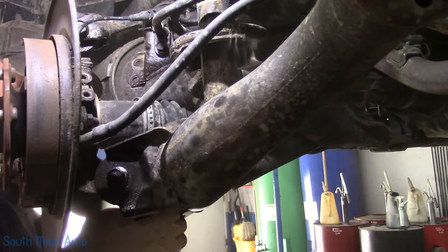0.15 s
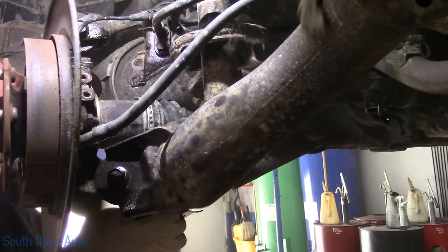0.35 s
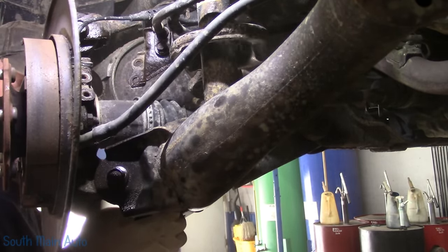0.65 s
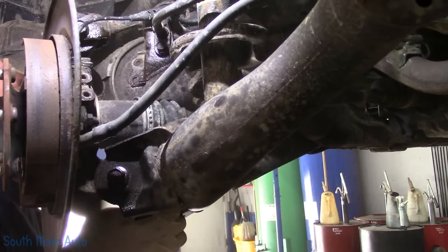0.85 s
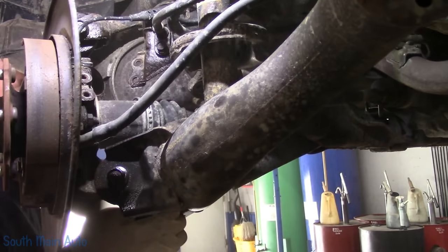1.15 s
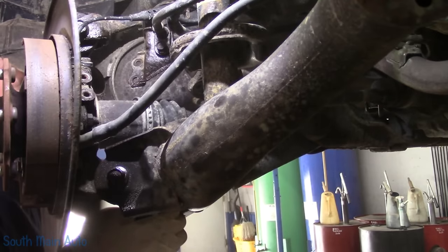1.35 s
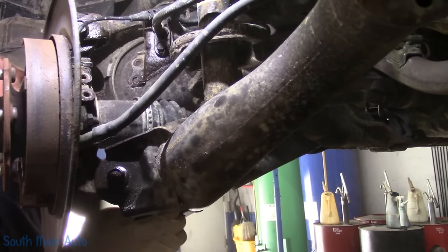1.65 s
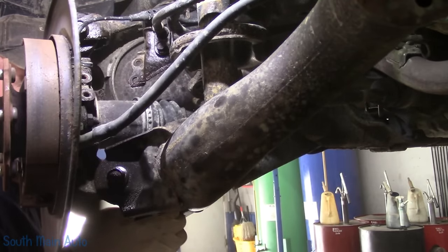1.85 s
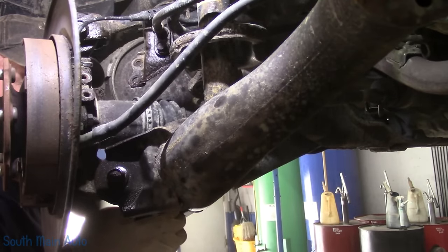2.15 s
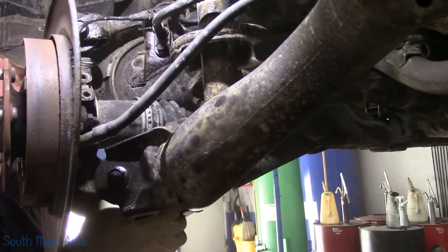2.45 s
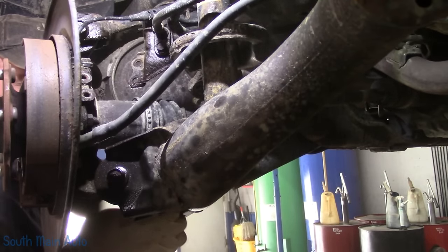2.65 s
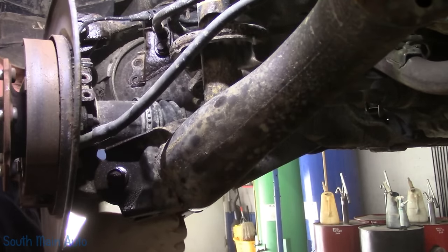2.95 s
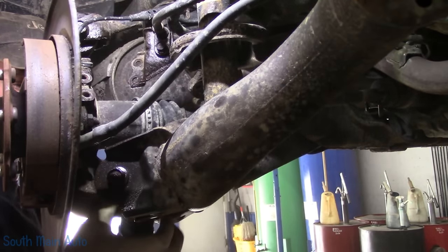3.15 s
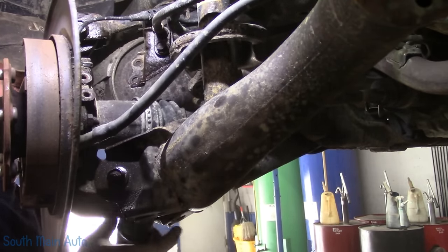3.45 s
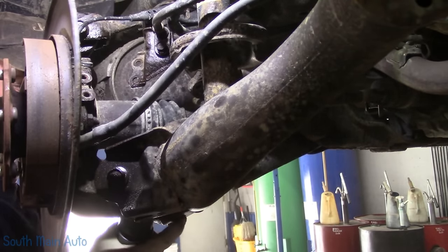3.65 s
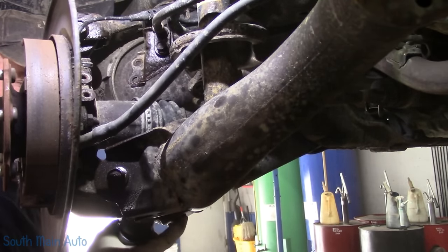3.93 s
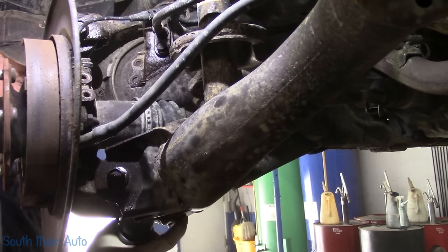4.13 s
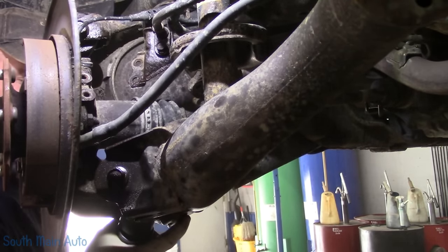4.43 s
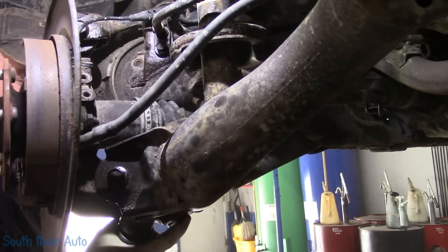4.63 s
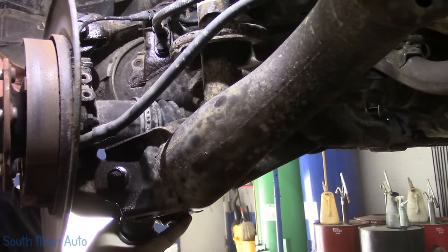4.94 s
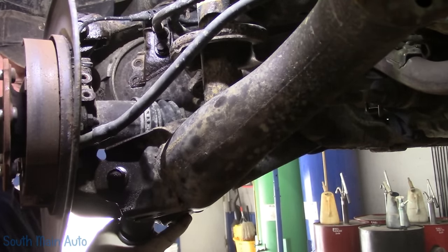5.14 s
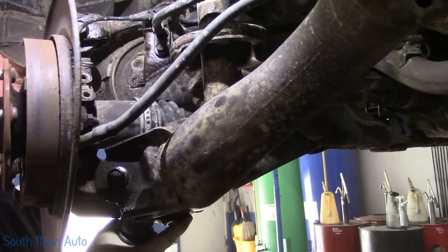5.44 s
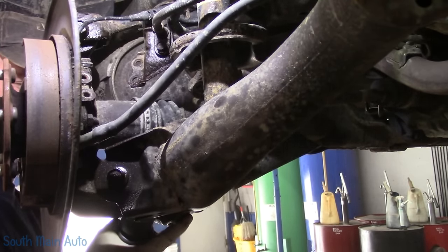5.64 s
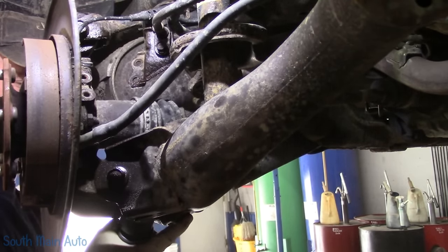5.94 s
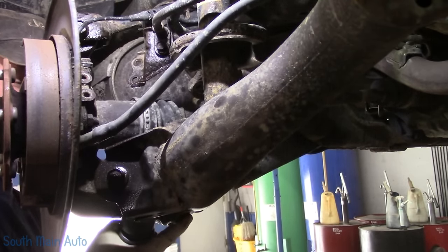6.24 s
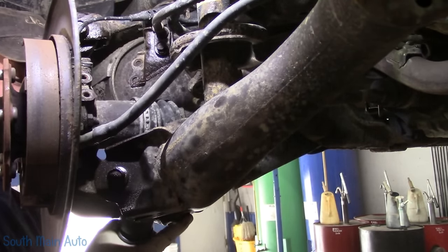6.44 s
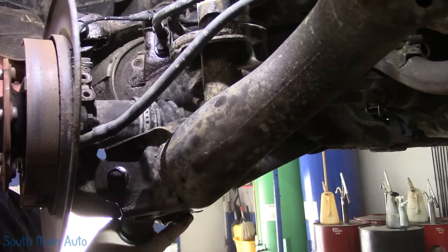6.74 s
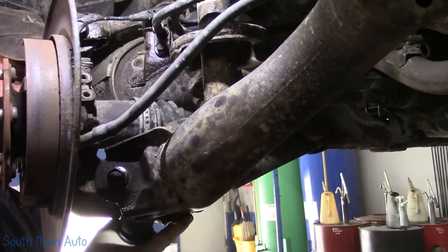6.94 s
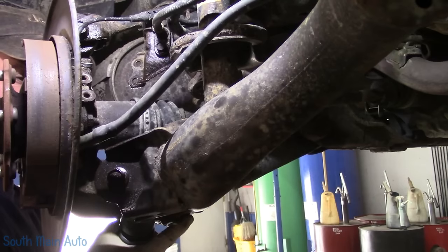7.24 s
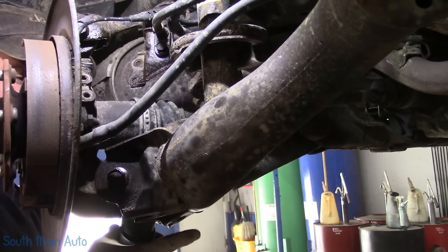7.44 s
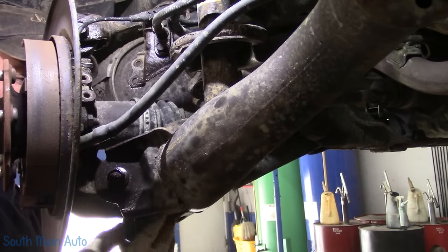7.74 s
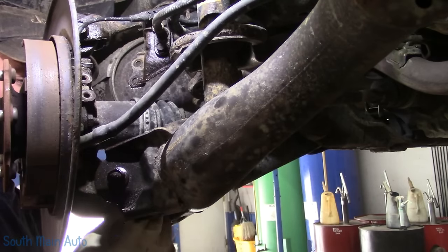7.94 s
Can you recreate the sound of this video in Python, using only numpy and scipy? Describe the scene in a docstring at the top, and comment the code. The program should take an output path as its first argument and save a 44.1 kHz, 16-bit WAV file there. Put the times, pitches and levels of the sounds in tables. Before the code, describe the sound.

Very close, loud air hammer already running on a socket over a rusted bolt beneath a car: rapid, hard steel cracks with ringing metal, rattling panels and a clanging suspension arm. It stops suddenly after about seven seconds; a burst of air and the garage echo swell up and fade, followed by a few light clinks and a dull bump.

```python
"""An air hammer pounds a socket on a rusted suspension bolt under a car, about 29 blows a second.
Each blow is a burst of noise for the crack, fading tones for the steel and a low clang in the chassis.
Panels rattle, spent air puffs out, and fading noise makes the garage's echo. Gain control holds it all down,
so a last rush of air and the echo swell when the piston stalls.
Then come light clinks and a dull bump as the tool is lifted off."""
import sys
import numpy as np
from scipy import signal
from scipy.fft import rfft, irfft
from scipy.io import wavfile
from scipy.ndimage import uniform_filter1d, minimum_filter1d

SR = 44100
rng = np.random.default_rng(int(sys.argv[2]) if len(sys.argv) > 2 else 0)


def to_wav(s):
    """Save 16-bit WAV."""
    ch = np.atleast_2d(s).T  # columns
    pcm = np.round(np.clip(ch, -1, 1) * 32767)  # PCM
    wavfile.write(sys.argv[1], SR, pcm.astype(np.int16))


N = 356560

# Background hiss of the workshop. Each row: frequency in Hz, relative level in dB per Hz.
SHOP_SPECTRUM = [(30, -6.5), (100, -17.5), (400, -3.5), (1300, 2.5), (3700, -6), (8000, -17.5),
                 (15000, -30.5)]
SHOP_LEVEL_DB = -66
# How long the garage echoes. Each row: frequency in Hz, time to fade by 60 dB in seconds.
GARAGE_FADE = [(50, .5), (200, 1.2), (500, 0.7), (1200, 0.87), (2500, 0.9164), (4000, 0.7678),
               (7000, 0.6078), (10000, .5), (15000, 0.01)]
# How strongly the garage echoes. Each row: frequency in Hz, echo level in dB.
GARAGE_LEVEL = [(150, 2), (500, -1.5), (1200, 2), (2500, -3), (4000, -4), (7000, -6), (10000, -9.5),
                (15000, 2)]
# Difference between the two microphone ports. Each row: frequency in Hz, side minus mid in dB.
PORT_DIFFERENCE = [(50, -20.5), (150, -33), (350, -44.5), (1500, -88.5), (3000, -60), (4500, -21.5),
                   (7000, -13.5), (15000, -13.5)]
# Dull low thumps under the hammering. Each row: time in seconds, level in dB.
LOW_THUMPS = [(3.254, -18), (3.365, -24), (3.7, -23), (3.865, -22), (4.01, -27), (4.418, -19), (4.81, -19),
              (5.29, -20), (5.326, -20), (5.915, -24), (6.557, -26)]
# Colour of the body panels' chatter. Each row: frequency in Hz, relative level in dB per Hz.
PANEL_SPECTRUM = [(30, 1.5), (85, -13), (170, -11.5), (230, -17), (370, -4), (500, 1.5), (900, -4),
                  (1400, -4.5), (2200, -2.5), (4000, -10), (9000, -21.5)]
# Colour of the spent air. Each row: frequency in Hz, relative level in dB per Hz.
EXHAUST_SPECTRUM = [(30, -2.5), (300, -1), (1500, 1), (3000, -4.5), (4500, 2.5), (7000, -8.5), (10000, -14),
                    (16000, -23)]
# Air rushing out once the piston stalls, until the valve shuts. Each row: time in seconds, level in dB.
VENT_LEVEL = [(7.16, -52), (7.24, -27.5), (7.31, -30), (7.38, -32), (7.44, -36.5), (7.52, -57)]
# Colour of that rush of air. Each row: frequency in Hz, relative level in dB per Hz.
VENT_SPECTRUM = [(30, -47.5), (300, -17), (900, -2.5), (2400, -1.5), (3600, 0), (7000, -12), (10000, -31),
                 (16000, -53)]
# The loose bit and socket knock as the tool is lifted.
# Each row: time in seconds, level in dB, ring in Hz, its 60 dB fade in seconds, relative tick level in dB.
LIFT_CLINKS = [(7.448, -66.5, 12500, .01, 2.5), (7.584, -67, 11400, 0.0093, 0),
               (7.606, -61, 10040, 0.043, 11), (7.885, -54.5, 6490, 0.042, -1.5),
               (7.916, -52, 6470, 0.039, -18), (7.945, -65, 6450, 0.039, -11),
               (8.03, -67.5, 5510, 0.041, 6), (8.075, -64.5, 5420, 0.038, -2)]
# The tool's body bumps the suspension arm. One row: time in seconds, level in dB.
BODY_BUMP = (7.847, -28)
# Colour of the bump. Each row: frequency in Hz, relative level in dB per Hz.
BUMP_SPECTRUM = [(100, -13), (600, -5), (1500, -1), (2800, -3), (4400, -2.5), (5500, -21), (12000, -34.5)]

# Piston speed, sagging and recovering as the hand leans on the tool.
# Each row: time in seconds, blows per second.
PISTON_RATE = [(0.0, 29.32), (0.96, 29.16), (1.48, 28.16), (1.65, 28.75), (2.32, 28.73), (3.08, 29.95),
               (3.31, 27.75), (3.52, 30.6), (3.84, 28.92), (4.08, 29.33), (4.68, 28.04), (5.08, 29.5),
               (5.3, 29.11), (6.05, 28.01), (6.2, 28.89), (6.62, 28.13), (6.76, 29.69), (7.15, 28.41)]
FIRST_BLOW_S, TRIGGER_OFF_S = 0.0174, 7.15
# The piston's last, slow stroke on the air left in the tool. One row: time in seconds, change of force in dB.
LAST_STROKE = (7.1935, -6.5)
# Spells in which the tool bounces and limps, long-short.
# Each row: start in seconds, end in seconds, milliseconds by which even blows come late and odd ones early.
LIMP_SPELLS = [(1.57, 3.03, 0.4456), (4.0, 4.33, -0.886), (5.55, 6.68, -.75)]
# Spells in which the bit sits squarely on the socket and lets it ring.
# Each row: start in seconds, end in seconds, dB added to the socket's long note.
SQUARE_SPELLS = [(1.69, 2.17, 8), (2.17, 2.65, 4.5), (2.65, 3.17, 4.5), (3.17, 3.46, 10), (3.46, 4.1, 4.5),
                 (4.1, 5.15, 1.5), (5.2, 5.6, 9.5), (5.6, 6.7, 6.5), (6.7, 7.2, -0.5)]
SPELL_EDGE_S = .06  # the tool slides into and out of a spell
# Blows that stand out, landing hard or glancing off.
# Each row: time in seconds, extra dB in the socket's long note, in the bit, in the knuckle.
BLOW_ACCENTS = [(0.598, 5, -2, -1), (0.735, 6, -6, -1), (0.872, 5, -6, 1), (1.252, 5, -6, 1),
                (1.322, 5, -1, 1), (1.463, 5, -6, -1), (1.534, -3, 4, 1), (1.569, -3, 5, 0),
                (1.639, 5, -4, 0), (2.024, -3, 6, 1), (2.301, -4, 4, 1), (2.646, -4, 3, 1),
                (2.714, 3, -4, 3), (2.782, 2, 0, 4), (2.849, -2, 5, -2), (2.882, -6, -4, 1),
                (2.985, 2, -4, 4), (3.051, 4, -4, 1), (3.085, 4, -2, 0), (3.118, -6, 2, -2),
                (3.221, 1, 6, -1), (3.329, -3, -3, 4), (3.433, -2, -3, 4), (3.499, -5, 5, -2),
                (3.565, -6, -1, -2), (3.598, 3, 0, 4), (3.632, -6, 4, 2), (3.664, -1, 6, 1),
                (3.699, 2, -4, 0), (3.767, 4, -2, -2), (3.836, 4, 2, -2), (3.972, -6, 4, -4),
                (4.043, 5, -1, 1), (4.076, -6, 5, 5), (4.279, 6, -4, -1), (4.317, 5, -5, -1),
                (4.35, -4, 5, -1), (4.422, 6, 3, 2), (4.491, 5, 4, 3), (4.597, -4, 6, -1),
                (4.632, -4, 3, -1), (4.809, 8, 1, 1), (4.88, 3, 5, 3), (4.914, 5, -1, 1), (5.017, -4, 4, 0),
                (5.051, 4, 2, 4), (5.187, -5, 0, -2), (5.532, -1, 4, -4), (5.6, -6, 4, 4),
                (5.637, 3, -4, 2), (5.67, 0, 4, -4), (5.74, -6, 5, -4), (5.81, -6, 1, 0),
                (5.882, -4, -4, -4), (6.132, 3, -4, 0), (6.166, 2, -4, -1), (6.235, 2, 4, -4),
                (6.269, -6, 1, -4), (6.374, -4, -1, -4), (6.411, 3, -2, 4), (6.444, -6, -3, -4),
                (6.514, -6, 5, 4), (6.585, -5, 2, -4), (6.827, -1, 5, -4), (6.965, 6, -6, 1),
                (7.033, 4, 5, -1), (7.068, 2, 4, 1), (7.138, 9, -6, 2)]
LATE_DB_PER_MS = 1.5  # a late blow has had a longer stroke and rings the socket's long note harder
BIT_LOSS_PER_DB = 0.416  # dB the bit loses for each dB of sitting squarely
# Tones of the suspension arm and body panels.
# Each row: frequency in Hz, relative dB while loose, relative dB once seated, 60 dB fade in seconds.
CHASSIS_MODES = [(176, -34, -22, 0.056), (291.8, -11, -6, 0.0746), (349.3, -19, -14, 0.077),
                 (424.1, -15.5, -4, 0.069), (470.15, -1, -0.5, 0.157), (489.2, -1, -0.5, 0.1003),
                 (550.4, -6.5, -8, 0.16), (612.4, -5, -8, .1), (689.6, -7, -7, 0.15),
                 (738.7, -3, -1.5, .12), (759.46, -15.5, -2.5, 0.114), (821.3, -4, -9, 0.081),
                 (943.4, -6.5, -12, 0.105), (1002.1, -4, -5.5, .1), (1095.9, -7, -2.5, 0.127),
                 (1182.8, -14, -1, 0.071), (1228.3, -14.5, -4.5, .09), (1248.2, -5.5, -1.5, 0.094),
                 (1319.3, -8.5, -10.5, 0.1), (1426.8, -20, -4, 0.093), (1484.5, -12, -2.5, 0.089)]
# Rise and fall of the steering knuckle's ring. Each row: time in seconds, relative level in dB.
KNUCKLE_SWELL = [(0, 2.5), (.7, 4), (1.6, 1.5), (2.05, -0.5), (2.5, 1), (3.2, -9.5), (3.75, -7),
                 (4.05, -3.5), (4.3, -9), (4.6, -4.5), (5.2, -4), (5.45, 2.5), (5.7, -8.5), (6.4, 2),
                 (7.15, -1)]
CLANG_SHARE = 0.33  # dB of chassis clang for each dB of the knuckle's swell
# Tones of the steering knuckle. Each row: frequency in Hz, relative level in dB, 60 dB fade in seconds.
KNUCKLE_MODES = [(1622, 0, 0.09), (1660, -1, 0.035)]
# Tones of the hammer's bit. Each row: frequency in Hz, relative level in dB, 60 dB fade in seconds.
BIT_MODES = [(7081, -0.5, 0.0112), (7394, -3, 0.0167)]
# The stretch over which the socket is driven home. One row: start in seconds, end in seconds.
SEATING_SPAN = (1.225, 3.27)
# Tones of the socket.
# Each row: frequency in Hz, relative dB while loose, relative dB once seated, 60 dB fade in seconds.
SOCKET_MODES = [(2400, -3.5, -21, 0.024), (2680, -12, -8, 0.0185), (2854.5, 0, -4, .06),
                (3221.5, -4, -4.5, 0.0367), (3287, 1, -2.5, 0.038), (3586, -3, 2, 0.0145),
                (3815.6, -1.5, -3.5, 0.055), (3930, -10, -12.5, 0.035), (4256, -14, -24.5, .04),
                (4530, 1.5, -12.5, 0.0294), (4928, -3, -9.5, 0.0466), (5039, -2, -35, 0.023),
                (5466, -4.5, -27, 0.021)]
# The socket's long, clear ring. One row: frequency in Hz, 60 dB fade in seconds.
LONG_NOTE = (3550, .14)
# Colour of the crack of steel on steel. Each row: frequency in Hz, relative level in dB per Hz.
CRACK_SPECTRUM = [(30, -30.5), (200, -30), (700, -15), (1200, -9), (2100, -7), (2600, -2), (3300, 1.5),
                  (4300, -2), (5000, -4.5), (5800, -6), (8200, -5.5), (10000, -13), (12500, -22),
                  (14000, -22.5), (16000, -37.5)]
BOUNCE_GAP_S = .0018  # mean time between the socket's rebounds
EDGE_HZ = 15950  # upper band limit of the recorder


def gain_of(db):
    """Turns decibels into amplitude."""
    return 10 ** (np.asarray(db) / 20)


def unit(x):
    """Scales a response to energy 1."""
    return x / np.sqrt(np.sum(x ** 2) + 1e-20)


def read(points, hz):
    """Reads a table between its rows, with frequency on a log scale."""
    f, value = np.transpose(points)
    return np.interp(np.log(hz + 1), np.log(f + 1), value)


def seconds(length):
    """Gives the time of each sample over a length in seconds."""
    return np.arange(int(length * SR)) / SR


def fading(t, t60):
    """An amplitude that falls by 60 dB in t60 seconds, as in a damped vibration."""
    return np.exp(-np.log(1000) * t / t60)


def through(x, response):
    """Passes a sound through a response, so each sample sets it off anew."""
    return signal.oaconvolve(x, response)[:len(x)]


def colour(x, spectrum, size=2048):
    """Filters a sound to a spectrum, with the filter's energy as early as it can be."""
    hz = abs(np.fft.fftfreq(size, 1 / SR))
    log_gain = np.log(gain_of(read(spectrum, hz)))
    response = np.fft.ifft(np.exp(np.conj(signal.hilbert(log_gain)))).real
    return through(x, response)


def voiced(x, spectrum):
    """Colours a white sound and keeps its power."""
    filter_size = np.linalg.norm(colour(signal.unit_impulse(2048), spectrum))
    return colour(x, spectrum) / filter_size


def burst(t60, rise_s=0.00063, size=8192):
    """Countless close tones dying together, roughly even in spectrum; the contact takes a moment to build."""
    t = np.arange(size) / SR
    fade = fading(t, t60)
    z = rfft(rng.standard_normal(size) * fade)
    even = irfft(z / (abs(z) + 1e-12))
    return unit(even * np.sqrt(fade) * (1 - np.exp(-t / rise_s)))


def rattle(hits, t60, rise_s):
    """After each blow loose parts chatter: a fresh, dying spray of tiny contacts, made of noise."""
    t = seconds(.25)
    shape = unit((1 - np.exp(-t / rise_s)) * fading(t, t60))
    power = abs(through(hits ** 2, shape ** 2))
    return np.sqrt(power) * rng.standard_normal(N)


def ring(modes):
    """The response of a few damped tones of struck metal, added up."""
    t = seconds(.25)
    tones = [gain_of(db) * unit(np.cos(2 * np.pi * hz * t) * fading(t, t60)) for hz, db, t60 in modes]
    return unit(sum(tones))


def seating_ring(hits, modes):
    """Rings tones whose balance shifts as the socket is driven home; neighbours swing in opposite senses."""
    seated = np.interp(np.arange(N) / SR, SEATING_SPAN, (0, 1))
    t = seconds(.25)
    hz, loose_db, seated_db, t60 = np.transpose(modes)
    shapes = np.array([(-1) ** (k + 1) * unit(np.cos(2 * np.pi * hz[k] * t) * fading(t, t60[k]))
                       for k in range(len(hz))])
    before = gain_of(loose_db) @ shapes
    after = gain_of(seated_db) @ shapes
    mixed = through(hits * (1 - seated), before) + through(hits * seated, after)
    return mixed / np.linalg.norm(after)


def restruck(hits, modes):
    """Each landing of the bit checks the ring of the blow before and starts it afresh."""
    response = np.append(ring(modes), 0)  # silent after a full ring
    now = np.arange(N)
    last = np.maximum.accumulate(np.where(hits != 0, now, 0))
    return hits[last] * response[np.minimum(now - last, len(response) - 1)]


def carried(hits, hz, t60, jolt_rad=.6):
    """A ring that carries on from blow to blow: each blow tops it up and jolts its phase a little."""
    decay = unit(fading(seconds(.25), t60))
    swing = np.sqrt(2 * abs(through(hits ** 2, decay ** 2)))
    jolts = np.cumsum(jolt_rad * (hits != 0) * rng.standard_normal(N))
    return swing * np.cos(2 * np.pi * hz * np.arange(N) / SR + jolts)


def spells(table, times):
    """The sum of the spells that are on at each blow, with soft edges."""
    return sum(size * np.clip(np.minimum(times - start, end - times) / SPELL_EDGE_S + .5, 0, 1)
               for start, end, size in table)


def limp_ms(times):
    """How late each blow comes while the tool bounces, in turn late and early."""
    return (-1) ** np.arange(len(times)) * spells(LIMP_SPELLS, times)


def accents(times):
    """Extra dB of each blow in the socket, the bit and the knuckle."""
    extra = np.zeros((len(times), 3))
    for s, *db in BLOW_ACCENTS:
        extra[np.argmin(abs(times - s))] = db
    return extra.T


def knuckle_level(times):
    """How strongly each blow rings the knuckle, in relative dB."""
    return np.interp(times, *np.transpose(KNUCKLE_SWELL))


def blow_times(jitter_ms=.15):
    """One blow for each cycle of the piston, a little early or late, and then the last slow stroke."""
    t = np.arange(FIRST_BLOW_S, TRIGGER_OFF_S, 1 / SR)
    cycles = np.cumsum(np.interp(t, *np.transpose(PISTON_RATE))) / SR
    times = np.interp(np.arange(int(cycles[-1]) + 1), cycles, t)
    late_ms = limp_ms(times) + jitter_ms * rng.standard_normal(len(times))
    return np.append(times + late_ms / 1000, LAST_STROKE[0])


def strikes(times, level_db, scatter_db):
    """One impulse a blow; level_db is the train's rms before forces scatter and the last blow is changed."""
    force = gain_of(level_db + scatter_db * rng.standard_normal(len(times)))
    force[-1] *= gain_of(LAST_STROKE[1])
    train = np.zeros(N)
    train[np.round(times * SR).astype(int)] = force * np.sqrt(N / len(times))
    return train


def shop_air():
    """The workshop's steady background: coloured noise."""
    return gain_of(SHOP_LEVEL_DB) * voiced(rng.standard_normal(N), SHOP_SPECTRUM)


def echo_tail(onset_s=0.0261, order=256):
    """A spread-out echo made of noise, each band dying at its own speed."""
    t = seconds(1.4)
    hz, frame_s, z = signal.stft(rng.standard_normal(len(t)), SR, nperseg=order)
    decay = np.log(1000) / read(GARAGE_FADE, hz)[:, None]
    level = gain_of(read(GARAGE_LEVEL, hz))[:, None]
    z = z * level * np.exp(-decay * frame_s) * np.sqrt(2 * decay / SR)
    tail = signal.istft(z, SR, nperseg=order)[1][:len(t)]
    return tail * np.minimum(t / onset_s, 1) ** 2


def garage(x, turn_hz=4.3, count=3):
    """Three noise echoes take turns at a steady rate, which blurs the echo; the room starts already full."""
    lead_in = round(20 * SR / PISTON_RATE[0][1])  # about 20 blows played ahead
    x = np.concatenate([x[:lead_in], x])
    turn = np.pi * turn_hz * np.arange(len(x)) / SR
    echoes = 0
    for k in range(count):
        share = np.sqrt(2 / count) * np.cos(turn + np.pi * k / count)
        echoes = echoes + through(x * share, echo_tail())
    return echoes[lead_in:]


def thumps(hz=68, t60=0.036):
    """Short, soft low thumps, each a quickly fading low tone."""
    s, db = np.transpose(LOW_THUMPS)
    starts, t = np.zeros(N), seconds(.25)
    starts[np.round(s * SR).astype(int)] = gain_of(db)
    return through(starts, np.sin(2 * np.pi * hz * t) * fading(t, t60))


def panels(times, panels_db=-32.5, panel_t60=0.158):
    """The body panels chatter at every blow."""
    hits = strikes(times, panels_db, scatter_db=0.73)
    return voiced(rattle(hits, panel_t60, rise_s=0.00108), PANEL_SPECTRUM)


def exhaust(times, level_db=-40, delay_s=0.0252, width_s=0.0118):
    """Spent air puffs out of the tool between blows: noise that swells and dies."""
    puff = unit(np.exp(-((seconds(.1) - delay_s) / width_s) ** 2))
    flow = through(strikes(times, level_db, scatter_db=1.0), puff)
    return voiced(flow * rng.standard_normal(N), EXHAUST_SPECTRUM)


def vent():
    """The rush of air past the stalled piston, as turbulent noise."""
    s, db = np.transpose(VENT_LEVEL)
    level_db = np.interp(np.arange(N) / SR, s, db, left=-150, right=-150)
    return voiced(gain_of(level_db) * rng.standard_normal(N), VENT_SPECTRUM)


def clinks(tick_t60=0.0136):
    """Light knocks: one ringing tone over a tick centred on it."""
    out, t = np.zeros(N), np.arange(8192) / SR
    for s, db, hz, t60, tick_db in LIFT_CLINKS:
        tick_spectrum = [(hz / 4, -28), (hz * 0.7, -10), (hz, 0), (hz * 1.71, -14), (hz * 3, -32)]
        tick = colour(burst(tick_t60), tick_spectrum)
        tone = np.sin(2 * np.pi * hz * t) * fading(t, t60)
        sound = tone + gain_of(tick_db) * 2 * tick / abs(tick).max()
        part = out[round(s * SR):][:len(t)]
        part += gain_of(db) * sound[:len(part)]
    return out


def bump(t60=0.081, rise_s=0.0053):
    """One dull, soft knock of the tool's body: a slow-starting burst."""
    hit = signal.unit_impulse(N, round(BODY_BUMP[0] * SR))
    return gain_of(BODY_BUMP[1]) * voiced(through(hit, burst(t60, rise_s)), BUMP_SPECTRUM)


def clang(times, clang_db=-27.7, loose_db=-24):
    """Blows travel up the suspension arm and keep its low tones droning, stirred a little by loose parts."""
    hits = strikes(times, CLANG_SHARE * knuckle_level(times) + clang_db, scatter_db=0.5)
    loose_parts = gain_of(loose_db) * rattle(hits, t60=0.21, rise_s=0.0063)
    return seating_ring(hits + loose_parts, CHASSIS_MODES)


def rings(times, knuckle_db=-30, note_db=-33.3, socket_db=-27.0, bit_db=-25, socket_share=0.675):
    """Rings of knuckle, socket and bit: sitting squarely, the bit rings the socket more and itself less."""
    square_db = spells(SQUARE_SPELLS, times)
    in_socket, in_bit, in_knuckle = accents(times)
    on_socket = square_db + in_socket + LATE_DB_PER_MS * limp_ms(times)
    knuckle_hits = strikes(times, knuckle_level(times) + in_knuckle + knuckle_db, scatter_db=1.2)
    note_hits = strikes(times, on_socket + note_db, scatter_db=1.0)
    # the socket's other tones take only a share of these changes
    socket_hits = strikes(times, socket_share * on_socket + socket_db, scatter_db=0.5)
    bit_hits = strikes(times, bit_db + in_bit - BIT_LOSS_PER_DB * square_db, scatter_db=0.97)
    return (restruck(knuckle_hits, KNUCKLE_MODES) + carried(note_hits, *LONG_NOTE)
            + seating_ring(socket_hits, SOCKET_MODES) + through(bit_hits, ring(BIT_MODES)))


def rebounds(hits, rebound_db=-10, fade_db_per_s=600, count=6):
    """The socket bounces on the bolt after each blow, at uneven moments and ever more weakly."""
    at = np.flatnonzero(hits)
    delay = BOUNCE_GAP_S * (1 + np.arange(count) + rng.random((len(at), count)))
    size = hits[at, None] * gain_of(rebound_db - fade_db_per_s * delay)
    landing = at[:, None] + np.round(delay * SR).astype(int)
    return np.bincount(landing.ravel(), size.ravel(), N)


def crack(times, level_db, snap_t60=0.01437, clatter_t60=0.046, clatter_db=-3, bounce_t60=0.00622,
          wander=0.674, count=6):
    """Steel on steel: a snap that shifts as the contact point wanders, rebounds, and a clatter of rust."""
    hits = strikes(times, level_db, scatter_db=0.0)
    # each blow mixes the same few bursts in its own shares
    shares = wander * rng.standard_normal((count, len(times)))
    shares[0] = 1
    shares /= np.linalg.norm(shares, axis=0)
    t = np.arange(N) / SR
    snap = sum(through(hits * np.interp(t, times, share), burst(snap_t60, rise_s=0.000259))
               for share in shares)
    bounces = rattle(rebounds(hits), bounce_t60, rise_s=0.000185)
    clatter = gain_of(clatter_db) * rattle(hits, clatter_t60, rise_s=.0003)
    return voiced(snap + bounces + clatter, CRACK_SPECTRUM)


def steel(times, crack_db=-19.6, rings_spread_db=-11):
    """The steel heard close by, and the part that reaches the room: small parts radiate rings poorly."""
    snap, ringing = crack(times, crack_db), rings(times)
    return snap + ringing, snap + gain_of(rings_spread_db) * ringing


def ports(x, spread_t60=0.0216, size=300):
    """Two close microphone ports hear nearly the same, but for a fluttering difference, mostly treble."""
    flutter = uniform_filter1d(rng.standard_normal(N), size) * np.sqrt(size)
    spread = through(x, burst(spread_t60))
    side = colour(spread * np.sqrt(2) * np.sin(2 * flutter), PORT_DIFFERENCE)
    return np.array([x + side, x - side])


def scene(steel_echo_db=-2.8, clang_echo_db=-13, handling_echo_db=-9):
    """The hammer, the car and the room around them."""
    times = blow_times()
    close, radiated = steel(times)
    arm, handling = clang(times), clinks() + bump()
    around = panels(times) + exhaust(times) + vent()
    into_room = around + gain_of(steel_echo_db) * radiated
    into_room = into_room + gain_of(clang_echo_db) * arm + gain_of(handling_echo_db) * handling
    echo = garage(into_room)
    return ports(close + arm + handling + thumps() + around + echo + shop_air())


def limit(x, ceiling_db, release_s, size=60, order=1):
    """Watches the level over `order` samples, a moment ahead; turns down and recovers, quickly at first."""
    level = np.sqrt(abs(uniform_filter1d((x ** 2).max(0), order)))
    peak = -minimum_filter1d(-level, 2 * size)
    over_db = np.maximum(20 * np.log10(peak + 1e-9) - ceiling_db, 1e-6)
    over_db[0] = np.median(over_db) + 2 * np.std(over_db)  # already held down by the running hammer
    fall = np.arange(N) / (release_s * SR)
    held_db = np.exp(np.maximum.accumulate(np.log(over_db) + fall) - fall)
    return x / gain_of(uniform_filter1d(held_db, size))


def record(dry, low_cut_hz=210, preamp_db=20, ceiling_db=-10, release_s=0.245):
    """The microphone's bass cut, gain control, a fast peak limiter, soft overload and the band limit."""
    thin = signal.lfilter(*signal.butter(1, low_cut_hz, "high", fs=SR), dry)
    held = limit(thin * gain_of(preamp_db), ceiling_db, release_s, order=220)
    held = limit(held, ceiling_db=-3, release_s=.005, size=64)
    rounded = held / (1 + (held / .7) ** 6) ** (1 / 6)
    band_limit = signal.firwin(301, EDGE_HZ, window=("kaiser", 9), fs=SR)
    return signal.oaconvolve(rounded, band_limit[None], "same")


dry = scene()
out = record(dry)
to_wav(out)
```